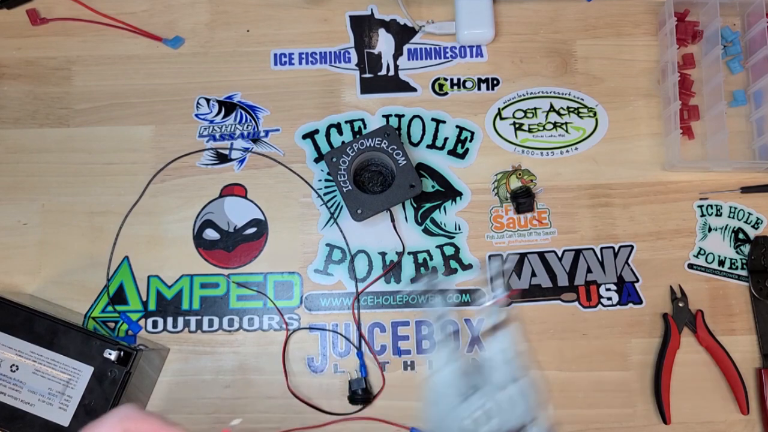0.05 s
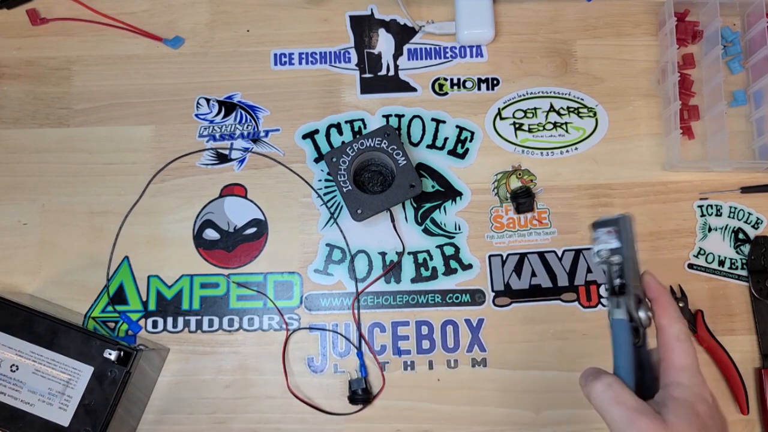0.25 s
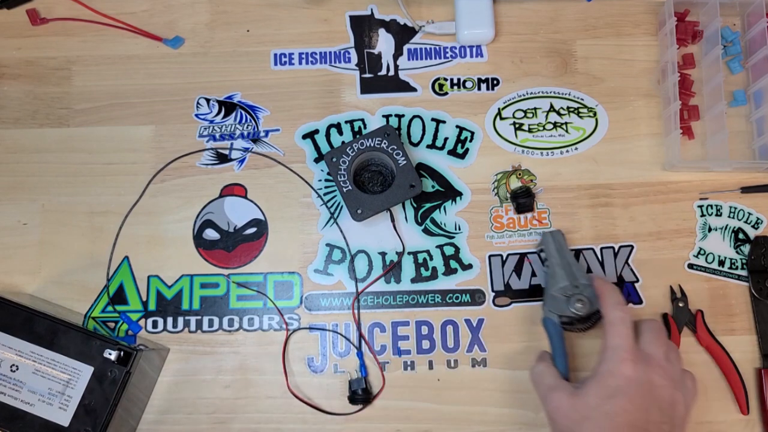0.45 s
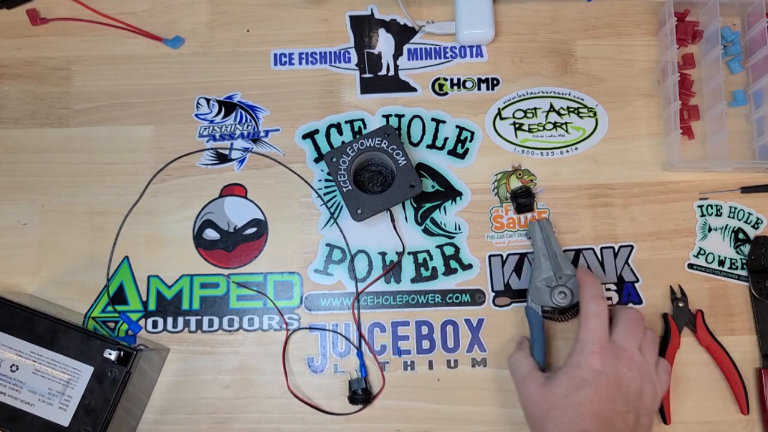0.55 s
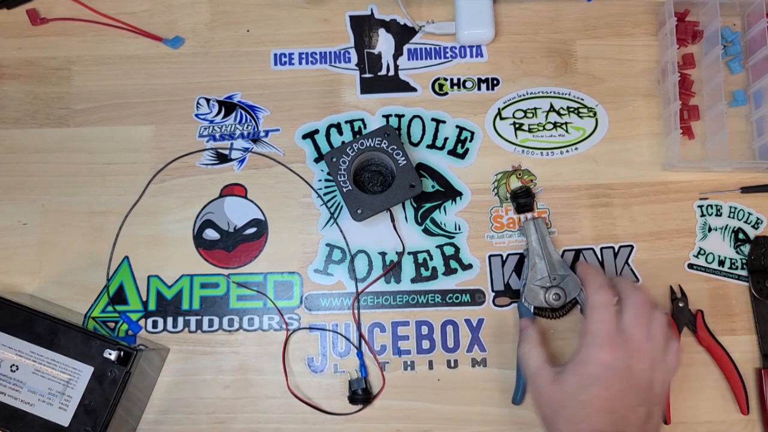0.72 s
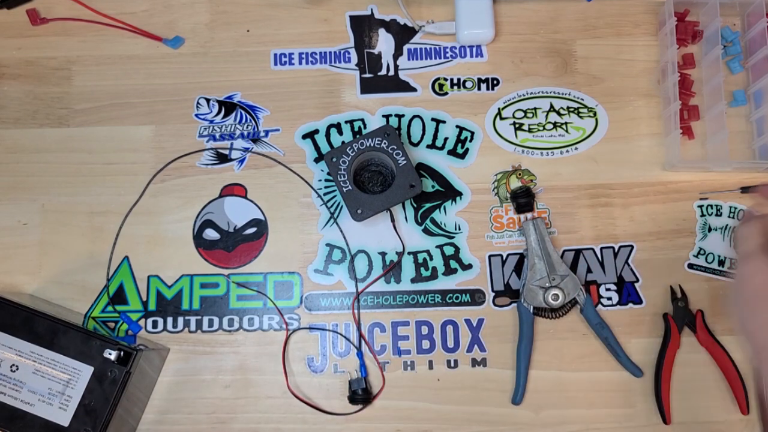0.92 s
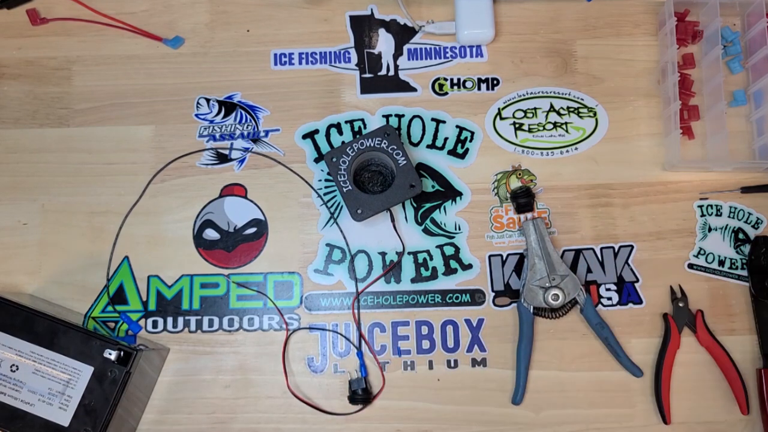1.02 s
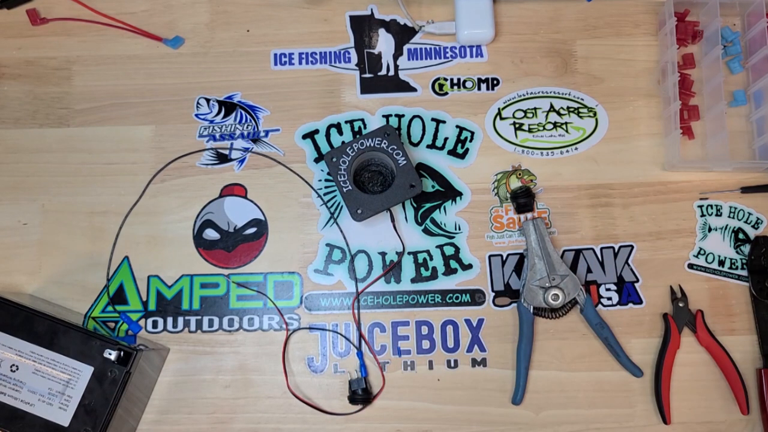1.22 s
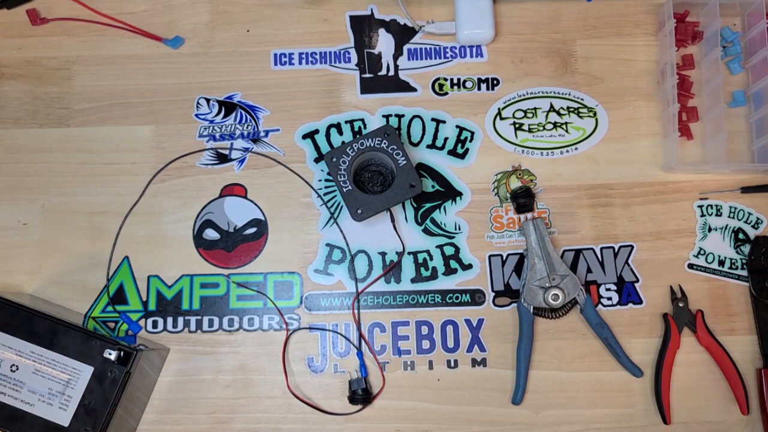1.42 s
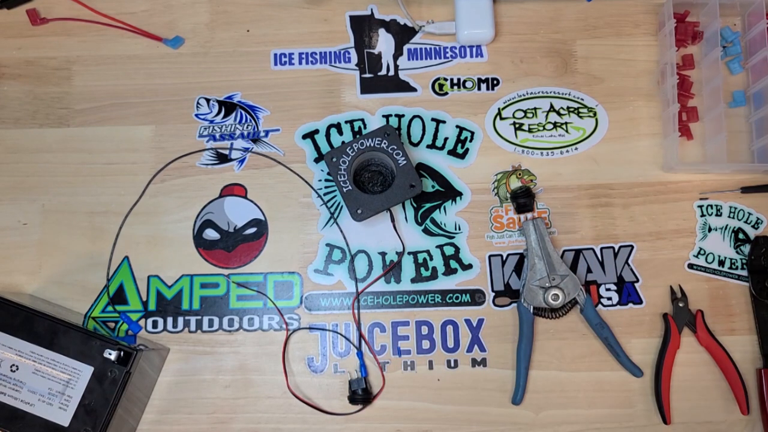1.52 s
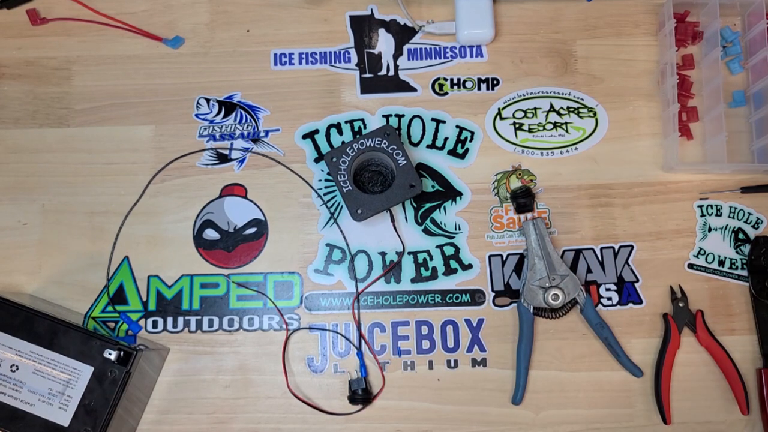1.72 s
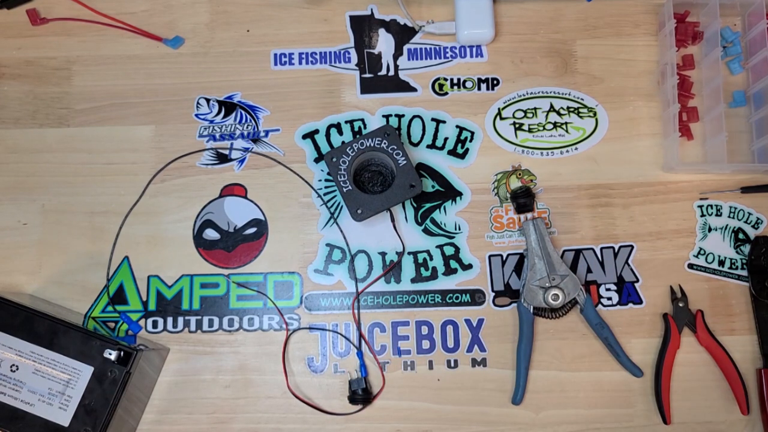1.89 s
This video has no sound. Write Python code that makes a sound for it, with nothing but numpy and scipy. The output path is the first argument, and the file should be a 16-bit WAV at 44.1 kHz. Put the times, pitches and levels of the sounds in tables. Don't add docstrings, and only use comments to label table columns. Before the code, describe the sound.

A hand tool's metal jaws snap, then it knocks onto a wooden tabletop; small plastic parts rattle afterwards.

```python
import sys
import numpy as np
from scipy import signal
from scipy.fft import rfft, irfft
from scipy.io import wavfile
from scipy.ndimage import uniform_filter1d

SR = 44100
rng = np.random.default_rng(int(sys.argv[2]) if len(sys.argv) > 2 else 0)


def digitize_waveform(pressure):
    field = np.atleast_2d(pressure).T
    bounded = np.clip(field, -1, 1)
    quanta = np.round(bounded * 32767).astype(np.int16)
    wavfile.write(sys.argv[1], SR, quanta)


def boost(x):
    u = np.asarray(x, float) / 20
    return 10 ** u


N = 85995
FFT_SIZE = 2 ** 17
FREQ = np.maximum(np.fft.rfftfreq(FFT_SIZE, 1 / SR), 1)
FAR_SHADE_DB = -14
LEFT_LAG_MS, BENCH_LAG_MS = 0.431, 0.33


def level(x, db):
    return x * boost(db) / np.sqrt(np.mean(x ** 2))


def curve(points):
    p = np.array(points)
    return np.interp(np.log(FREQ), np.log(p[:, 0]), p[:, 1])


def shape(x, gain):
    return irfft(rfft(x, FFT_SIZE) * gain)[..., :N]


def causal(db):
    c = irfft((db - db.max()) * np.log(10) / 20)
    c[1:len(c) // 2] *= 2
    c[len(c) // 2 + 1:] = 0
    return np.exp(rfft(c))


def hump(hz, width):
    s = 1j * FREQ / hz
    return s * width / hz / (1 + s * width / hz + s * s)


def ring(x, modes):
    out = 0
    for hz, db, t60 in modes:
        pole = np.exp((2j * np.pi * hz - np.log(1000) / t60) / SR)
        out = out + boost(db) * signal.lfilter([1], [1, -pole], x).imag
    return out


def burst(s, db, ms):
    t = np.maximum(np.arange(N) / SR - s, 0) * 1000
    noise = rng.standard_normal((2, N))
    envelope = np.minimum(t / .4, 1) * np.exp(-t / max(ms, .2))
    grit = boost(14 * uniform_filter1d(noise[1], size=16))
    x = envelope * noise[0] * grit
    return boost(db) * x * np.sqrt(np.sum(envelope ** 2) / np.sum(x ** 2))


def push(s, db, ms):
    u = (np.arange(N) / SR - s) * 1000 / ms
    return boost(db) * np.sin(np.pi * np.clip(u, 0, 1)) / (ms * SR / 1000 * 2 / np.pi)


def ports(x, shade_db, lag_ms=LEFT_LAG_MS):
    shade_hz, scatter_hz, scatter_ms = 5000, 1400, 2
    high = FREQ ** 2 / (FREQ ** 2 + shade_hz ** 2)
    t = np.arange(1024) / SR * 1000
    scatter = rng.standard_normal(len(t)) * np.exp(-t / scatter_ms)
    scatter = rfft(scatter / np.sqrt(np.sum(scatter ** 2)), FFT_SIZE)
    mix = FREQ ** 4 / (FREQ ** 4 + scatter_hz ** 4)
    path = np.sqrt(1 - mix) + np.sqrt(mix) * scatter
    lag = np.exp(-2j * np.pi * FREQ * lag_ms / 1000)
    left = shape(x, path * boost(shade_db * high) * lag)
    return np.array([left, x])


def air():
    # (frequency [Hz], level [dB per Hz])
    hiss_colour = [(48, -10.5), (110, -12), (185, -31), (270, -19.5), (1100, -29.5), (3300, -42),
                   (6000, -54), (11900, -57.5)]
    # (frequency [Hz], width [Hz], level [dB])
    whines = [(120, 20, -59), (794, 5, -66), (1113, 5, -69), (9250, 60, -93)]
    unlike = np.clip(FREQ / 1500, .05, 1)

    def pair(gain, db):
        own, shared = rng.standard_normal((2, N)), rng.standard_normal(N)
        alike = ports(shape(shared, gain * np.sqrt(1 - unlike ** 2)), 0)
        return level(shape(own, gain * unlike) + alike, db)

    out = pair(boost(curve(hiss_colour)) * (FREQ < 12000), -52.5)
    out = out + pair(hump(76, 30) ** 2, -46.5)
    for hz, width, db in whines:
        out = out + pair(hump(hz, width) ** 2, db)
    left_gain = boost(-6.0 * FREQ ** 4 / (FREQ ** 4 + 4500.0 ** 4) + 1.07)
    return shape(out, np.array([left_gain, FREQ ** 0]))


def jaws():
    # (time [s], level [dB], burst length [ms], left treble against right [dB])
    snaps = [
        (0.0005, -41, 5.4, -3),
        (0.225, -42, 10, -12),
        (0.2316, -24.5, 1.6, -11.5),
        (0.2338, -12.5, 1.94, -15),
        (0.2403, -16, 2.47, 2),
        (0.2440, -16.5, 2.5, 5.5),
        (0.2476, -19, 1.1, 9),
        (0.2507, -24.5, 2.6, 7),
        (0.26, -28, 4.4, -6),
    ]
    # (frequency [Hz], level [dB], t60 [s])
    steel_modes = [(3000, -6, .015), (3700, -5, .02), (7400, -7, .03), (7480, -14, .1), (9300, -18, .08),
                   (11230, -8, .03), (13700, -6, .02), (15400, -3, .02)]
    # (frequency [Hz], level [dB per Hz])
    steel_colour = [(300, -41), (600, -29.5), (1100, -24), (2200, -16), (3000, -4), (4000, -4.5),
                    (6000, -11), (15500, 0.5)]
    colour = causal(curve(steel_colour))
    ring_gain = boost(-35) / (1 + 1800 / (1j * FREQ)) ** 2
    out = 0
    for s, db, ms, shade_db in snaps:
        hit = burst(s, db + 6.5, ms)
        steel = shape(ring(hit, steel_modes), ring_gain)
        out = out + ports(shape(hit, colour) + steel, shade_db)
    return out


def room(x, linger):
    # (frequency [Hz], t60 [s])
    decay = np.array([(100, 0.12), (400, 0.18), (1200, 0.24), (3000, 0.18), (7000, 0.15), (14000, 0.11)])
    gap_ms, alike_hz = 6, 900
    t, tail = np.arange(N) / SR, 0
    for hz in 70 * 2 ** np.arange(8):
        t60 = linger * np.interp(np.log(hz * np.sqrt(2)), np.log(decay[:, 0]), decay[:, 1])
        noise, unlike = rng.standard_normal((3, N)), min(hz / alike_hz, 1)
        mixed = unlike * noise[:2] + np.sqrt(1 - unlike ** 2) * noise[2]
        band = shape(mixed, (FREQ >= hz) & (FREQ < 2 * hz))
        tail = tail + band * 10 ** (-3 * t / t60)
    tail = tail * np.clip(t * 1000 / gap_ms, 0, 1)
    tail = tail / np.sqrt(np.sum(tail ** 2, axis=1, keepdims=True))
    return signal.fftconvolve(x, tail, axes=1)[:, :N]


def spring():
    # (time [s], level [dB], centre [Hz], width [Hz], burst length [ms])
    ticks = [(0.0010, -33, 4100, 1500, 8.5), (0.147, -53, 8100, 8840, 2.4), (0.459, -44.5, 4260, 2470, 6.3),
             (0.477, -50, 11600, 12000, 1), (0.4764, -25.5, 3350, 1940, 6.8),
             (0.5020, -44, 9500, 9300, 2.3), (0.502, -31, 15000, 495, 12), (0.611, -39, 11100, 9100, 1.4),
             (0.6555, -34, 9300, 12200, 9.8), (0.6586, -24, 2950, 880, 37), (0.6578, -14, 5250, 814, 2.8),
             (0.6585, -15, 8500, 1200, 3.2), (0.6588, -5.5, 15530, 600, 8.5), (0.694, -27, 7300, 8900, 2.9),
             (0.698, -20.5, 4300, 1200, 4.3), (1.0011, -36.5, 14940, 6000, 1.1),
             (1.005, -34.5, 14800, 6000, 1.4), (1.0090, -44, 13030, 5000, 1.1),
             (1.0790, -76, 13900, 4000, 2), (1.38, -34.5, 13800, 8030, 11)]
    out = 0
    for s, db, hz, width, ms in ticks:
        out = out + shape(burst(s, db, ms), hump(hz, width) ** 2)
    return ports(out, FAR_SHADE_DB)


def pings():
    # (time [s], peak level [dB], frequency [Hz], swell [ms])
    ping_list = [(0.2316, -20.5, 7460, 1.4), (0.241, -28, 2890, 2.1), (0.2400, -41.5, 586, 1),
                 (0.2401, -32.5, 1346, 0.83), (0.2440, -26.5, 3500, 1), (0.2465, -34, 3560, 1.5),
                 (0.249, -33, 2636, 2.2), (0.4860, -22.5, 626, 2.5), (0.5197, -26.5, 598, 1.9),
                 (0.475, -23, 1170, 1.9), (0.4761, -26.5, 412, 2.5), (0.6943, -17.5, 1260, 3.8),
                 (0.6960, -27.5, 758, 4.1), (0.697, -30, 4170, 0.96), (0.4765, -34.5, 1810, 2.6),
                 (0.4775, -27, 822, 1.9), (0.6965, -26, 1733, 1.7), (1.3850, -36.5, 922, 2),
                 (1.4130, -35, 980, 1.5), (0.7000, -17, 384, 3.8), (0.519, -31, 1308, 3.8),
                 (0.6570, -35, 528, 3.3), (0.656, -24.5, 1051, 4.2), (0.6586, -26.5, 1510, 3.4),
                 (0.6563, -39.5, 2760, 2.6), (0.6577, -39.5, 3320, 1.5), (0.656, -47, 5430, 2.5),
                 (0.658, -42, 5470, 1.2), (1.3785, -21, 1324, 1.53), (1.3800, -32.5, 3110, 3.1),
                 (1.3870, -35.5, 2100, 1.5), (1.391, -32.5, 2803, 3), (1.3950, -25.5, 1658, 2.2),
                 (1.397, -43, 1270, 1.8), (1.409, -38, 1680, 2.3), (1.42, -33.5, 1740, 0.77),
                 (1.4210, -32, 3100, 1.16), (1.4470, -45.5, 825, 8), (1.6020, -47.5, 2300, .8),
                 (1.7440, -63.5, 2900, 2), (1.8702, -46.5, 1850, 1.5), (1.884, -45.5, 2550, 1.2),
                 (1.9415, -43, 2260, .9), (1.9420, -45, 4420, 2)]
    t, out = np.arange(N) / SR, 0
    for s, db, hz, ms in ping_list:
        u = np.maximum(t - s, 0) * 1000 / ms
        out = out + boost(db) * u * np.exp(1 - u) * np.sin(2 * np.pi * hz * (t - s))
    return ports(out, -5, BENCH_LAG_MS)


def bench():
    # (time [s], level [dB], contact [ms], thump level [dB], clack [Hz])
    knocks = [(0.4756, -20.5, 0.6, -31, 544), (0.4851, -32, 1, -70, 756), (0.5064, -32, 0.62, -68, 870),
              (0.5195, -40, 1, -28.5, 640), (0.6569, -18, 0.13, -41, 550), (0.6946, -12, 0.64, -24.5, 478),
              (0.7029, -25.5, 0.51, -49, 396), (0.711, -36, 0.53, -29.5, 540), (0.737, -48, 0.46, -33, 485),
              (1.3789, -36, 0.24, -30, 390), (1.4500, -37.5, 1, -44, 658), (1.523, -46, 0.97, -64, 590)]
    # (frequency [Hz], level [dB], t60 [s])
    top_modes = [(252.5, -8, 0.2), (328, -26, 0.039), (397.4, -3.5, 0.26), (463, -15, 0.053),
                 (528, -16.5, 0.062), (604, -23, 0.063), (689, -5.5, 0.17), (793, -3, 0.16),
                 (947, -13, .09), (1032, 2.5, 0.19), (1170, -6, 0.24), (1304, 4.5, 0.17), (1510, -4, 0.17),
                 (1785, -11, 0.077)]
    # (frequency [Hz], level [dB], t60 [s])
    frame_modes = [(56.6, -6.5, 0.31), (102.8, -7.5, 0.21), (150, 0.5, 0.027)]
    # (frequency [Hz], level [dB per Hz])
    buzz_colour = [(120, -18), (200, -28), (300, -3), (450, -0.5), (750, -0.5), (1300, 4.5), (1800, -8.5),
                   (3000, -22)]
    ring_db, scatter_db, second_handle_db, clack_t60 = -11.5, 2, 2.5, 0.0067
    out, colour = 0, causal(curve(buzz_colour))
    clack_gain = 2 * np.e * np.log(1000) / (clack_t60 * SR)
    clack_low_cut = (1 / (1 + 350 / (1j * FREQ))) ** 2
    for s, db, ms, thump_db, hz in knocks:
        first = push(s, db, ms)
        force = first + push(s + 1 / hz, db + second_handle_db, ms)
        handle = [(hz, 0, clack_t60)]
        clack = clack_gain * ring(ring(force, handle), handle)
        top = [(f, g + ring_db + scatter_db * rng.standard_normal(), t60) for f, g, t60 in top_modes]
        thump = ring(push(s, thump_db, 3), frame_modes)
        buzz = shape(burst(s, db + 12, 6), colour)
        out = out - shape(clack, clack_low_cut) - ring(first, top) + thump + buzz
    return ports(out, -14.5, BENCH_LAG_MS) * boost(np.array([[1.5], [0]]))


def parts():
    # (time [s], level [dB], burst length [ms], centre [Hz])
    part_hits = [(1.37, -35.5, 22, 3500), (1.379, -14.5, 3, 1400), (1.3813, -17.5, 3.6, 3200),
                 (1.387, -24, 8.6, 2980), (1.396, -28.5, 5, 2830), (1.4100, -30.5, 12, 2980),
                 (1.4215, -30.5, 5.5, 2800), (1.444, -35.5, 16, 3000), (1.4620, -41, 14, 1500),
                 (1.489, -47.5, 11, 2480), (1.508, -48, 15, 1810), (1.522, -56, 3.3, 6500),
                 (1.5500, -43.5, 2, 6900), (1.5920, -55, 8, 2000), (1.6030, -48.5, 5.9, 2430),
                 (1.6230, -60, 3, 2980), (1.64, -40.5, 2.3, 2540), (1.7429, -50, 10, 3000),
                 (1.8707, -42, 5, 2040), (1.883, -43, 8.6, 2580), (1.903, -53, 7.3, 2000),
                 (1.9410, -40.5, 9.8, 4500)]
    # (frequency [Hz], level [dB per Hz])
    plastic_colour = [(200, -14), (400, -11), (900, -6), (1350, -1), (1950, -5.5), (3100, -6), (5500, -15),
                      (16000, -35)]
    colour, out = causal(curve(plastic_colour)), 0
    for s, db, ms, hz in part_hits:
        out = out + shape(burst(s, db + 6, ms), colour * (1 + hump(hz, hz)))
    return ports(out, FAR_SHADE_DB) * boost(np.array([[-3.5], [0]]))


def scene():
    held = jaws()
    close = np.array([spring(), pings(), bench(), parts()])
    wet = boost(np.array([-12.5, -10, -9.5, -6.5]))
    tails = room(np.tensordot(wet, close, 1), 1) + room(boost(-6.5) * held, 1.72)
    u = np.maximum(np.arange(N) / SR - 0.22, 0) * 1000 / 64
    dip = boost(-4.5 * u * np.exp(1 - u))
    return held + close.sum(axis=0) + tails + air() * dip


def low_pass(x):
    return signal.sosfilt(signal.butter(12, 16810, fs=SR, output="sos"), x)


def record(dry):
    x = signal.sosfilt(signal.butter(2, 24, "high", fs=SR, output="sos"), dry)
    x = signal.sosfilt(signal.ellip(8, .3, 60, 15750, fs=SR, output="sos"), x)
    return low_pass(x)


dry = scene()
out = record(dry)
digitize_waveform(out)
```